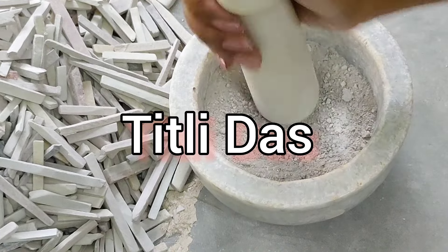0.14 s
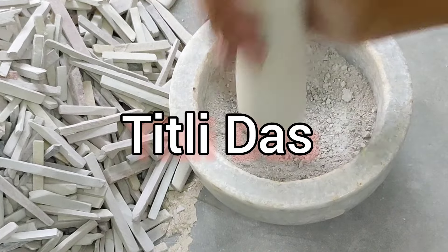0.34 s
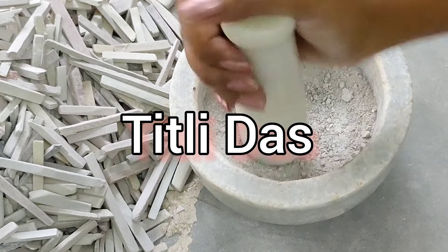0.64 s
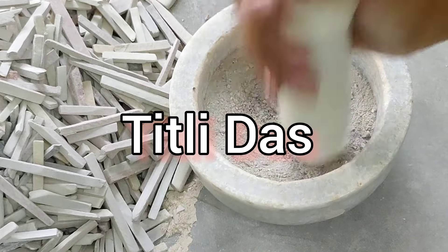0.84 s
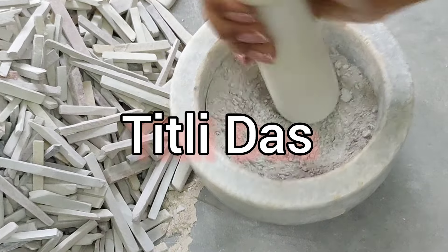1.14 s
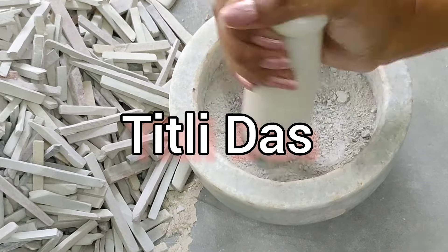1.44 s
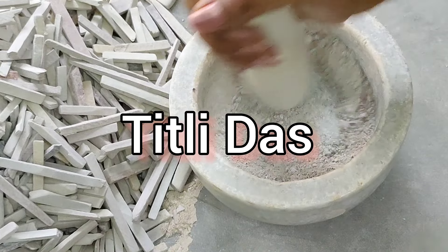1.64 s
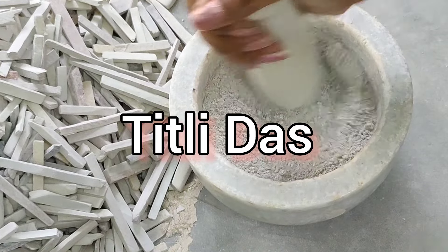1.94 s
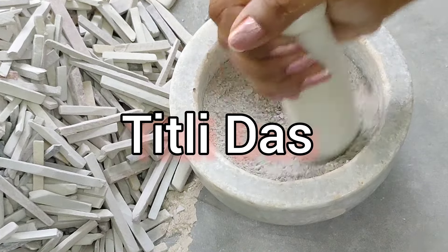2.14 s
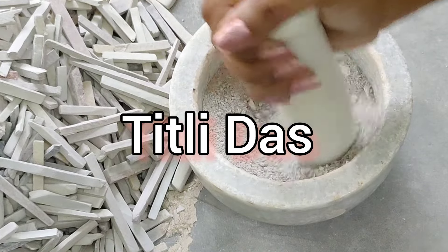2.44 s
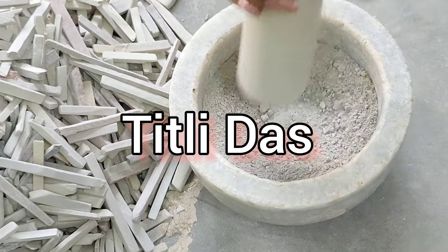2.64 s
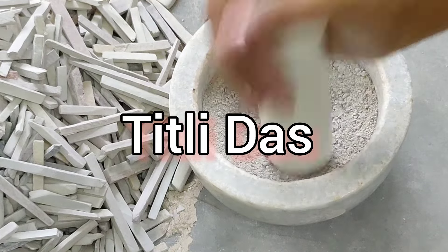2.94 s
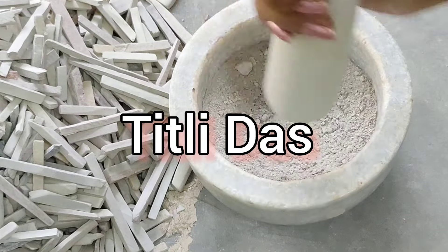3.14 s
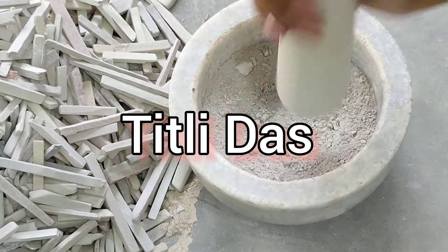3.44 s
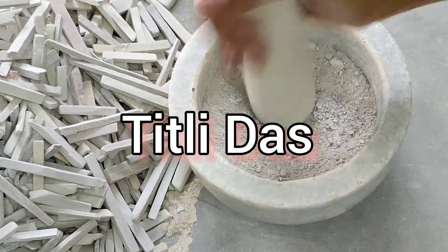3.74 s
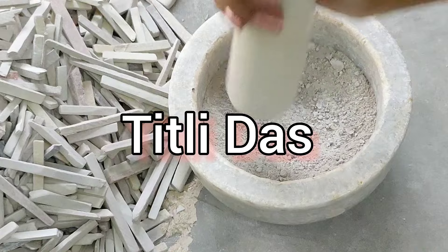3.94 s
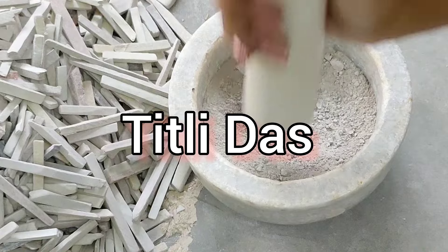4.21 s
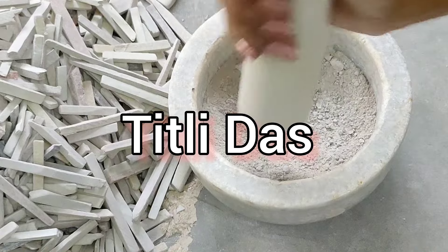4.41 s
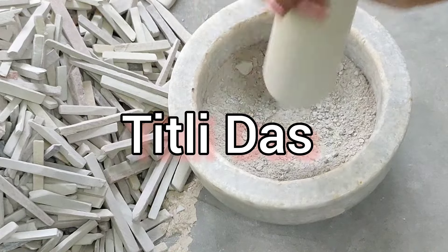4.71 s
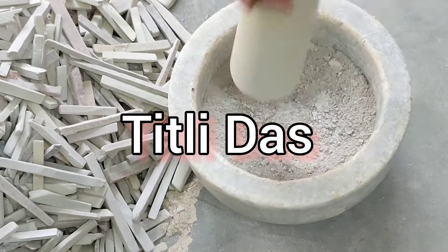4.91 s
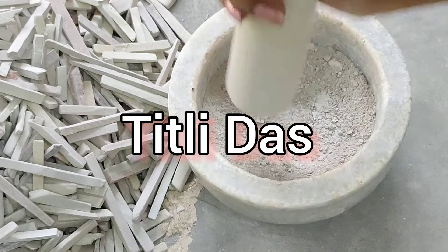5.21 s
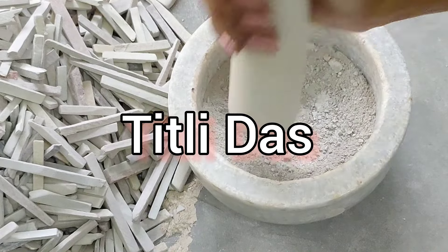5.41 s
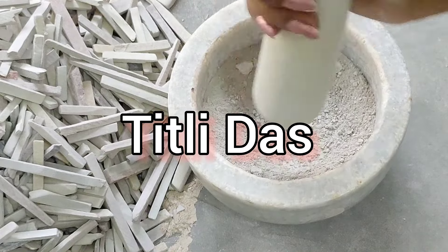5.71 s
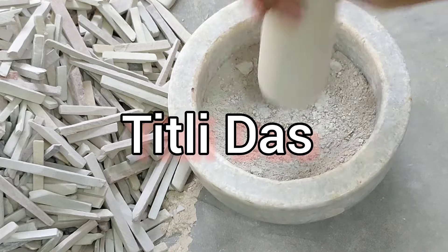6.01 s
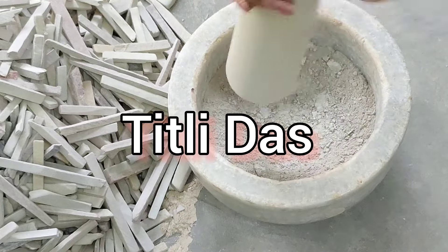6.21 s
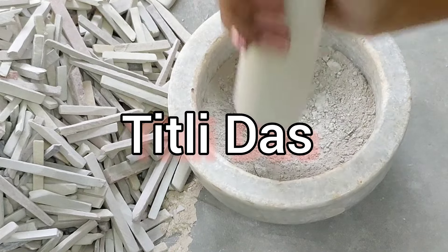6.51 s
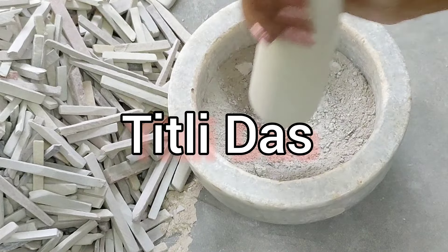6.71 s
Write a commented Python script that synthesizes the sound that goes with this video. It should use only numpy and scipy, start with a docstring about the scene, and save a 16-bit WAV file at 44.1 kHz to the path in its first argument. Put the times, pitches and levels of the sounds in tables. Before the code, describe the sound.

Steady, dull stone knocks sound close up in a bare, slightly echoing room as a pestle crushes chalk in a mortar. The beat stops for just over a second, leaving a soft rustle of stirred powder and a few faint clinks, then returns for a longer run. The blows vary in strength, the bowl rocks on the floor, and moving air rumbles lightly on the microphone.

```python
"""Pounding chalk in a stone mortar

A stone pestle pounds chalk in a mortar on the hard floor of a bare room, in two runs with a pause.
Each blow is a short push of air, a crack and a clack; the mortar then often knocks back on the floor.
The room answers with low modes and a diffuse tail, powder hisses, and air rumbles on the microphone."""
import sys
import numpy as np
from scipy import signal
from scipy.io import wavfile

SR = 44100
rng = np.random.default_rng(int(sys.argv[2]) if len(sys.argv) > 2 else 0)


def to_wav(s):
    """Save 16-bit WAV."""
    ch = np.atleast_2d(s).T  # columns
    pcm = np.round(np.clip(ch, -1, 1) * 32767)  # PCM
    wavfile.write(sys.argv[1], SR, pcm.astype(np.int16))


N = 302526

# Pestle blows. Each row: mid-contact in seconds, push in dB, floor thud in dB, thud weight from 0 to 1,
# bowl clack in dB, crack in dB, pestle ring in dB, pitch favoured by the point of contact in Hz.
BLOWS = [(0.0615, -4, -4, 0.82, -15, -24.5, -71, 5300), (0.3204, -11, -10.5, 1, -31.5, -31, -71, 4400),
         (0.571, -10, -11, 0.62, -30.5, -34.5, -75, 8420), (0.8207, -5, -7, 0.4, -19, -29.5, -61, 5350),
         (1.0831, -3.5, -5.5, 0.73, -12.5, -24, -54, 4400), (1.3385, -6, -9, 0.42, -24, -32.5, -73, 5300),
         (2.6747, -8.5, -11, 0.14, -24, -28, -66, 8250), (2.9171, -12, -13.5, 0.56, -44.5, -40, -52, 5300),
         (3.1775, -5.5, -7.5, 0.84, -24, -39, -53, 5540), (3.4418, -10, -13, 0, -26, -30, -66, 5300),
         (3.7084, -5, -7, 0.4, -13, -23.5, -56, 5200), (3.9608, -5.5, -9, 0.01, -16, -22.5, -65, 12780),
         (4.2117, -8, -9, 0.36, -30.5, -33.5, -60, 8200),
         (4.4634, -6.5, -11.5, 0.14, -22.5, -33.5, -64, 5230),
         (4.7274, -3, -5.5, 0.07, -9, -23, -65.5, 8340), (4.9864, 1, -5, 0, -6, -19, -51.5, 5200),
         (5.2375, -4, -8, .64, -25.5, -27.5, -81, 8300), (5.4863, -9.5, -9, 1, -30.5, -28.5, -54.5, 5400),
         (5.7463, -3, -5.5, 0.9, -16.5, -23, -63, 5300),
         (6.0067, -3.5, -6.5, 0.38, -16.5, -23.5, -75, 8250),
         (6.2651, -1, -5, 0.41, -11.5, -24, -59.5, 8250), (6.518, -5.5, -9.5, 0.12, -22, -25, -63, 8250),
         (6.7645, 2, -3, 0.06, -9, -25, -48, 5170)]
# The mortar rocks on the floor. Each row: start in seconds, level in dB, brightness in dB per octave.
KNOCKS = [(0.0695, -25, -10.5), (0.3293, -39.5, -1), (0.6063, -27, -12), (0.633, -55, -7),
          (0.8273, -18.5, 7), (0.8573, -33, -5), (1.1122, -23, -13.5), (1.1185, -23.5, -1),
          (1.1222, -39, -6), (1.1497, -26.5, -7), (1.358, -47, -5), (2.7106, -33, 2), (2.9567, -19, -2.5),
          (2.9907, -38, 2), (3.0149, -25.5, -13.5), (3.2103, -25, -5), (3.2417, -33, -12),
          (3.4727, -19, -6.5), (3.483, -20, 3.5), (3.507, -27.5, -4), (3.7145, -31.5, 15.5),
          (3.73, -31.5, 6), (3.9839, -23.5, -5.5), (4.2164, -24, 3.5), (4.2445, -23, -7),
          (4.471, -24.5, 7.5), (4.4992, -22, -8.5), (4.7607, -39, 0), (4.7891, -23, 7.5),
          (4.9959, -20.5, -7.5), (5.2583, -28, -14.5), (5.5249, -16, -3.5), (5.7538, -15.5, 1.5),
          (6.0609, -18, 0), (6.214, -40, -16.5), (6.224, -38, -13), (6.2306, -37, -19.5), (6.241, -31, -14),
          (6.279, -41, -7), (6.5436, -23.5, -6), (6.7765, -11.5, 6), (6.8025, -36, -5)]
# Resonances. Each row: pitch in Hz, level in dB, time to fall 60 dB in seconds.
PESTLE_MODES = [(4400, 3, 0.35), (4500, -7.5, 0.11), (5250, -2, 0.15), (5360, -2, 0.1), (8100, 2, 0.15),
                (8260, 3, 0.17), (8420, 2, 0.15), (12780, 8, .15)]
MORTAR_MODES = [(515, -8, 0.011), (790, -3.5, 0.0043), (826, 2, 0.0055), (1342, 7, 0.0092),
                (1898, -7.5, 0.034), (2147, -0.5, 0.0079), (3350, -21.5, 0.0049)]
ROOM_MODES = [(88, -13, 0.74), (132, -4.5, 0.95), (174.9, -3, 2.1), (335.2, -8, 0.46), (379.4, -10.5, 1.04),
              (421.1, -3.5, 0.4), (469, -5.5, 0.72), (508.4, -17, 0.3), (722, -1.5, 0.28),
              (777, -2.5, 0.25)]
CLINK_MODES = [(508, -16, 0.2), (611, -7.5, 0.2), (1070, -14, 0.11), (1320, -8, 0.079), (1980, -22, 0.08),
               (2270, -27, 0.061)]
TICK_MODES = [(4350, -6, .02), (5000, -3, .02), (5700, 0, .015), (6500, 0, .015),
              (7400, -2, .012), (8300, -3, .012)]
# Noise colours. Each row: frequency in Hz, relative level in dB.
TAIL_COLOUR = [(60, -19), (150, -1.5), (260, -8), (400, -1), (600, -7.5), (780, -2.5), (1000, -6.5),
               (1400, -3), (1800, -1.5), (2500, -4), (3400, 2), (4100, -24.5), (6000, 13), (12000, -16)]
POWDER_COLOUR = [(2600, -2.5), (3300, -13.5), (4200, -9), (5200, -3.5), (6400, 3), (8200, -0.5),
                 (9300, -17), (11500, -17), (14000, -12), (16000, -31)]
RUMBLE_COLOUR = [(12, -52), (20, -26), (38, 15), (59, -1.5), (82, 10.5), (168, -3.5), (300, -40),
                 (390, -69), (660, -120)]
ROOM_TONE_COLOUR = [(59, -31), (100, -1), (131, -5), (270, -15.5), (425, -10.5), (1330, -18.5),
                    (4400, -50), (5190, -45.5), (7080, -50), (11600, -37), (14000, -63)]
# Reverb length before the closing fade. Each row: frequency in Hz, time to fall 60 dB in seconds.
TAIL_T60 = [(60, 0.78), (160, 0.77), (420, 0.95), (1100, 0.57), (2900, 0.55), (7700, 0.44)]
# Reverb pan. Each row: frequency in Hz, left over right in dB.
TAIL_PAN = [(60, 1.5), (180, 0.5), (550, 0.5), (1650, -0.5), (4970, 4.5), (15000, -10)]
# First reflections. Each row: left delay in ms, left level in dB, right delay in ms, right level in dB.
ECHOES = [(6.5, -41.5, 6.8, -14.5), (9.0, -19, 2.6, -13), (14.0, -54, 29, -15)]
# Width of diffuse sound. Each row: frequency in Hz, left-right likeness from 0 to 1.
LIKENESS = [(50, 0.053), (130, 0.24), (300, 0.97), (600, 0.5), (1200, 0.042), (3000, 0.04), (12000, 0.041)]
# Powder slides after blows and under the stirring pestle.
# Each row: start in seconds, time until the fall in seconds, level in dB, fall in dB per second.
SLIDES = [(.063, 0.074, -58, 165), (.325, 0.12, -61.5, 100), (.575, 0.097, -61.5, 122),
          (.822, 0.025, -60.5, 207), (1.04, 0.034, -50.5, 300), (1.085, 0.089, -59, 130),
          (1.34, 0.18, -66, 94), (1.57, 0.064, -52, 79), (1.79, 0.016, -56, 92),
          (1.89, 0.019, -63.5, 203.5), (2.2, 0.076, -63.5, 155.5), (2.677, 0.054, -59, 200),
          (2.9, .13, -53.5, 110), (3.18, 0.034, -68.5, 124), (3.445, 0.095, -57.5, 97),
          (3.715, 0.15, -51.5, 107), (3.963, 0.12, -58, 106), (4.213, 0.032, -84, 137),
          (4.465, 0.098, -65, 156), (4.73, 0.036, -60.5, 132), (4.99, 0.042, -60, 130),
          (5.24, 0.045, -61, 134), (5.49, 0.047, -62, 98), (5.601, 0.073, -50.5, 100),
          (5.75, 0.092, -53, 150), (6.01, 0.055, -66, 107), (6.13, 0.15, -67, 100),
          (6.268, 0.055, -62.5, 125), (6.52, 0.24, -63, 99.5), (6.768, .08, -66, 92)]
# Thin whistles. Each row: start and end in seconds, level in dB, first and last pitch in Hz.
WHISTLES = [(0.898, 1.076, -63, 3480, 3330), (1.887, 2.02, -73, 3960, 4160),
            (2.169, 2.294, -70.5, 4060, 3900), (2.3, 2.66, -67, 6220, 5850),
            (2.462, 2.677, -64, 5470, 5170), (2.805, 2.89, -70, 3130, 3240),
            (4.376, 4.458, -70.5, 4770, 4500), (5.63, 5.745, -56.5, 3350, 3350)]
# Wind, calm while the arms rest. Each row: time in seconds, level in dB, left over right in dB.
RUMBLE = [(0.0, -31, -11), (0.5, -33, 9.5), (0.75, -37.5, 0.5), (1.32, -50.5, -18), (1.6, -47, -16),
          (1.8, -36.5, 11.5), (2.15, -60.5, 29), (2.4, -70, 34.5), (2.7, -31.5, 14.5), (3.05, -28, -0.5),
          (3.3, -31, -6), (3.9, -36.5, 1.5), (4.25, -30.5, 3), (4.5, -33.5, -7), (5.0, -23.5, 1.5),
          (5.55, -36.5, -3.5), (5.9, -32, -1.5), (6.5, -34, 0), (6.86, -39.5, -3.5)]
# Puffs of air. Each row: centre in seconds, peak in dB, pitch in Hz, left over right in dB.
PUFFS = [(0.383, -8, 148, 30), (0.995, -19, 132, 8), (1.711, -27.5, 88, 16), (1.796, -16, 126, 24),
         (1.818, -13.5, 91.5, 24), (1.842, -22.5, 150, 23), (1.967, -29.5, 112, 21),
         (2.104, -19.5, 107, 47), (2.363, -32.5, 91, 34), (2.459, -29, 86.1, 39), (2.607, -30, 138, 29),
         (2.704, -6.5, 89, 27), (2.795, -15, 121, 5), (2.836, -13.5, 92.5, 32), (2.879, -18.5, 96, -23),
         (3.039, -13.5, 89, 26), (3.128, -14.5, 92, -26), (3.385, -24, 132, -32), (4.163, -17, 108, 30),
         (4.283, -14.5, 85, 19), (4.316, -15.5, 87, 15), (4.407, -13.5, 131, -30), (4.628, -19, 137, -23),
         (4.943, -20, 87, 25), (5.007, -11.5, 159, -13), (5.109, -16, 89, -19), (5.166, -16, 142, -29),
         (5.579, -18, 159, 20.5), (5.778, -11, 89.5, 11), (6.359, -14.5, 83.7, 25), (6.409, -16.5, 132, -8)]
# Faint clinks in the pause. Each row: start in seconds, level in dB.
CLINKS = [(2.222, -45.5), (2.243, -57), (2.297, -35), (2.324, -48), (2.344, -44.5)]

SWING_MS, SWING_MS_PER_DB = 0.54, -0.037   # suction to pressure at 0 dB; harder blows are shorter
REBOUND_PER_DB = -0.022   # pressure outweighs suction in soft blows
THUD_STRETCH, THUD_STRETCH_PER_DB = 1.086, 0.0319   # the thud widens against the push as blows harden
SPRING_SHARE = 0.32   # share of the thud's weight that does not reach the floor
CRACK_MS, CRACK_BAND_HZ, SNAP_BAND_HZ = 0.9, [3200, 9500], [1500, 2900]
HELD_DOWN = 0.35   # the pressing pestle shortens the bowl's ring to this share
CUSHION_HZ = 2270   # dust softens every contact of the bowl above this


def pestle_blows():
    """A bell-shaped contact force radiates its slope as a push and thuds into the floor; chalk cracks."""
    push, thud, crack = np.zeros((3, N))
    t_ms = np.arange(-150, 150) / SR * 1000
    for s, push_db, thud_db, weight, _, crack_db, _, _ in BLOWS:
        start = s - 150 / SR
        grit = rng.standard_normal(300)
        swing = 2 * t_ms / (SWING_MS + SWING_MS_PER_DB * push_db)
        pressure = (swing + REBOUND_PER_DB * push_db) * np.exp(-swing ** 2 / 2)
        add(push, start, from_db(push_db) * pressure / pressure.max())
        floor_swing = swing / (THUD_STRETCH + THUD_STRETCH_PER_DB * push_db)
        bell = np.exp(-floor_swing ** 2 / 2)
        pulse = (floor_swing + weight) * bell
        pulse /= pulse.max()
        pulse -= SPRING_SHARE * pulse.sum() * bell / bell.sum()
        # the chalk gives way in steps, so each thud has a colour of its own
        steps = np.r_[1, .12 * grit[1:] * (abs(grit[1:]) > 2.3)]
        add(thud, start, from_db(thud_db) * np.convolve(pulse, steps / np.linalg.norm(steps)))
        add(crack, start, from_db(crack_db) * grit * np.exp(-np.abs(t_ms) / CRACK_MS))
    snap = from_db(1.5) * butter(crack, SNAP_BAND_HZ, "band")
    return push + snap, thud, butter(crack, CRACK_BAND_HZ, "band")


def pestle_ring():
    """The pestle rings most near the pitch its contact point favours; dust roughens the ring."""
    times, *_, ring_db, favoured_hz = np.transpose(BLOWS)
    rings = struck(times, lambda hz: ring_db - 60 * abs(np.log2(hz / favoured_hz)), PESTLE_MODES, 1.5)
    return rings * from_db(7 * drift(240))


def mortar_knocks():
    """The bowl rocks back on the floor and rings freely; brightness tilts its modes about 1.3 kHz."""
    times, db, tilt = np.transpose(KNOCKS)
    rings = struck(times, lambda hz: db + tilt * np.log2(hz / 1300), MORTAR_MODES, spread_db=1.5)
    return butter(rings, CUSHION_HZ, order=4)


def mortar_clacks():
    """The bowl clacks under each blow, bright and damped by the pestle."""
    times, _, _, _, db, *_ = np.transpose(BLOWS)
    damped = [(hz, mode_db, HELD_DOWN * t60) for hz, mode_db, t60 in MORTAR_MODES]
    clacks = struck(times - .0004, lambda hz: db + 4.6 * np.log2(hz / 1300), damped, spread_db=2.5)
    return butter(clacks, CUSHION_HZ, order=4)


def room(send, lead_s=0.084):
    """The bare room answers with first reflections, low standing waves and a diffuse tail."""
    # a softer copy of the first blow leaves the room already ringing at the start
    lead, first = round(lead_s * SR), round((BLOWS[0][0] - .005) * SR)
    send = np.concatenate([from_db(-6.5) * send[first:first + lead], send])
    t = np.arange(SR) / SR
    tail = 0
    for hz, noise in bands(SR, 47.64, 17000, octaves=1 / 3):
        decay_db = at_hz(TAIL_COLOUR, hz) - 60 * t / at_hz(TAIL_T60, hz)
        tail += from_db(decay_db) * pan(at_hz(TAIL_PAN, hz)) * noise
    response = from_db(-27) * tail * (1 - np.exp(-(t / 0.00083) ** 2))   # reflections thicken
    for k, (hz, db, t60) in enumerate(ROOM_MODES):
        lean = pan((-1) ** (k // 2))   # each standing wave favours one side
        response += (-1) ** k * from_db(db - 46) * lean * ring(1. * (t == 0), hz, t60)
    for left_ms, left_db, right_ms, right_db in ECHOES:
        response[0, round(left_ms * SR / 1000)] += from_db(left_db)
        response[1, round(right_ms * SR / 1000)] += from_db(right_db)
    response *= from_db(-140 * t ** 2)   # closing fade, ever faster
    return signal.fftconvolve(send[None], response, axes=1)[:, lead:lead + N]


def powder(grains_per_s=900, rise_db_per_s=591):
    """Sliding powder hisses in clumps of grains; brief high ringing ticks colour the hiss."""
    impulses = rng.random(N) < grains_per_s * from_db(5 * drift(30)) / SR
    impulses = impulses * from_db(4.5 * np.minimum(rng.exponential(1, N), 4))
    grains = 1 + 0.7 * unit_rms(signal.lfilter([1], [1, -.96], impulses))
    hiss = unit_rms(grains * coloured(POWDER_COLOUR, 2300, 17500, flicker_db=3.5, rate=6, octaves=1 / 6))
    ticks = rng.choice([-1, 0, 0, 1], (len(TICK_MODES), 2, N)) * impulses
    ringing_ticks = sum(from_db(db) * ring(hits, hz, t60)
                        for hits, (hz, db, t60) in zip(ticks, TICK_MODES))
    attack_s = 13 / rise_db_per_s   # each slide climbs its last 13 dB in this time
    envelope = sum(from_db(db + span_db(s + attack_s, s + held_s, rise_db_per_s, fall))
                   for s, held_s, db, fall in SLIDES)
    return envelope * (hiss + from_db(-7) * unit_rms(ringing_ticks))


def whistles(roughness_hz=140):
    """Thin, rough, faint whistles that glide slightly in pitch."""
    rough = unit_rms(butter(rng.standard_normal((2, N)), roughness_hz))
    out = np.zeros((2, N))
    for from_s, to_s, db, first_hz, last_hz in WHISTLES:
        tone = sine(np.interp(np.arange(N) / SR, [from_s, to_s], [first_hz, last_hz]))
        envelope = from_db(db + span_db(from_s, to_s, 200, 400))
        out += envelope * np.roll(rough, round(first_hz), axis=1) * tone
    return out


def wind():
    """Moving air hits the two microphone ports unevenly: a lumpy rumble and single puffs."""
    times, *curves = np.transpose(RUMBLE)
    db, pan_db = [np.interp(np.arange(N) / SR, times, curve) for curve in curves]
    out = from_db(db) * pan(pan_db) * coloured(RUMBLE_COLOUR, 30.33, 330, flicker_db=4.5, rate=7.1)
    for s, peak_db, hz, pan_db in PUFFS:
        cycles = np.arange(-1.5, 1.5, hz / SR)
        puff = np.cos(2 * np.pi * cycles) * np.exp(-(cycles / 0.41) ** 2)
        far_side_db = np.maximum([[-pan_db], [pan_db]], 0)
        add(out, s + cycles[0] / hz, from_db(peak_db - far_side_db) * puff)
    return out


def hum(from_s=1.453, to_s=1.78, hz=339, waver_hz=6):
    """A faint wavering tone lingers after the first run of blows and dies away."""
    fade_db = -42 * (np.arange(N) / SR - from_s) + span_db(from_s, to_s, 530, 280)
    return from_db(-35 + fade_db + 6.1 * drift(39)) * sine(hz + waver_hz * drift(11))


def clinks():
    """Soft touches on something hollow."""
    times, db = np.transpose(CLINKS)
    rings = struck(times, lambda hz: db, CLINK_MODES, spread_db=3)
    return np.convolve(rings, np.hanning(16) / 8, "same")


def room_tone():
    """A quiet, nearly steady bed of air."""
    return from_db(-62) * coloured(ROOM_TONE_COLOUR, 100, 14000, flicker_db=.7, rate=6)


def struck(times, db_at_hz, modes, spread_db):
    """Every hit rings every mode with a strength of its own."""
    at, out = np.round(times * SR).astype(int), np.zeros(N)
    chance_db = spread_db * rng.standard_normal((len(at), len(modes)))
    for k, (hz, mode_db, t60) in enumerate(modes):
        clicks = np.zeros(N)
        clicks[at] = (-1) ** (k + 1) * from_db(db_at_hz(hz) + mode_db + chance_db[:, k])
        out += ring(clicks, hz, t60)
    return out


def ring(clicks, hz, t60):
    """A unit click sets a sine of height 1 ringing."""
    r, w = from_db(-60 / (t60 * SR)), 2 * np.pi * hz / SR
    return signal.lfilter([0, np.sin(w)], [1, -2 * r * np.cos(w), r * r], clicks + 1e-18)


def coloured(spectrum, low_hz, high_hz, flicker_db, rate, octaves=0.495):
    """Stereo noise of a given colour whose bands flicker; rms 1."""
    together = drift(rate)
    return unit_rms(sum(from_db(at_hz(spectrum, hz) + flicker_db * (.5 * together + drift(rate))) * noise
                        for hz, noise in bands(N, low_hz, high_hz, octaves)))


def bands(size, low_hz, high_hz, octaves):
    """Yields the centre in Hz and the stereo noise of each narrow band of a diffuse field."""
    white = rng.standard_normal((2, 2, size))
    edges = low_hz * 2 ** np.arange(0, np.log2(high_hz / low_hz), octaves)
    for k, (low, high) in enumerate(zip(edges, edges[1:])):
        mid, side = butter(white[k % 2], [low, high], "band")
        hz = np.sqrt(low * high)
        alike = at_hz(LIKENESS, hz)
        yield hz, np.sqrt(1 + alike) * mid + np.sqrt(1 - alike) * side * [[1], [-1]]


def drift(rate):
    """A smooth random wobble, mostly below rate in Hz; rms 1."""
    r = np.exp(-80 * np.pi * rate / SR)
    slow = signal.lfilter([1], [1, -2 * r, r * r], rng.standard_normal(N // 40 + 2002))[2000:]
    return np.interp(np.arange(N) / 40, np.arange(len(slow)), unit_rms(slow))


def span_db(from_s, to_s, rise, fall):
    """0 dB between two moments, rising before and falling after in dB per second."""
    t = np.arange(N) / SR
    return np.minimum(0, np.minimum(rise * (t - from_s), fall * (to_s - t)))


def at_hz(points, hz):
    """Read a spectrum on a log-frequency axis."""
    frequencies, values = np.transpose(points)
    return np.interp(np.log(hz), np.log(frequencies), values)


def add(track, s, sound):
    """Lay a sound into a track at s seconds."""
    i = round(s * SR)
    track[..., i:i + sound.shape[-1]] += sound[..., :N - i]


def butter(x, hz, kind="low", order=2):
    """A low-, high- or band-pass filter."""
    return signal.sosfilt(signal.butter(order, hz, kind, fs=SR, output="sos"), x)


def sine(hz):
    """A sine that follows a pitch curve."""
    return np.sin(2 * np.pi * np.cumsum(hz) / SR)


def pan(db):
    """Stereo gains with left db above right."""
    return from_db(db * np.array([[.5], [-.5]]))


def from_db(db):
    """Decibels to gain."""
    return 10 ** (np.asarray(db) / 20)


def unit_rms(x):
    """Scale to rms 1."""
    return x / np.sqrt(np.mean(x ** 2) + 1e-20)


def scene():
    """Pestle and mortar up close, a little earlier and duller on the right, over room and background."""
    push, thud, crack = pestle_blows()
    rings = pestle_ring()
    knock, clack = mortar_knocks(), mortar_clacks()
    body = push + clack + from_db(2.5) * knock   # knocks reach the microphone more than the room
    edge = crack + rings
    left = np.roll(body + edge, 4)
    right = from_db(-2.5) * signal.lfilter([.35], [1, -.65], body) + from_db(-3.5) * np.roll(edge, -3)
    air = room_tone()
    reverb = room(thud + from_db(-12.5) * crack + from_db(-7.5) * rings + from_db(-3) * (clack + knock))
    faint = hum() * pan(6) + clinks()
    return np.array([left, right]) + reverb + wind() + powder() + whistles() + faint + air


def record(dry):
    """Roll off the deepest bass, round the loudest peaks at full scale and cut the very top."""
    thin = butter(dry, 70, "high")
    rounded = thin / (1 + thin ** 6) ** (1 / 6)
    top_cut = signal.cheby2(12, 70, 16600, fs=SR, output="sos")
    return np.clip(signal.sosfilt(top_cut, rounded), -1, 1)


dry = scene()
out = record(dry)
to_wav(out)
```